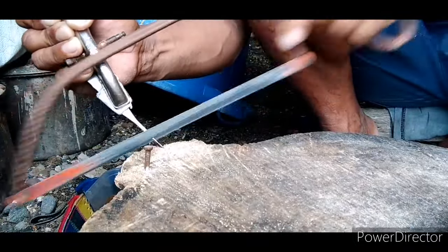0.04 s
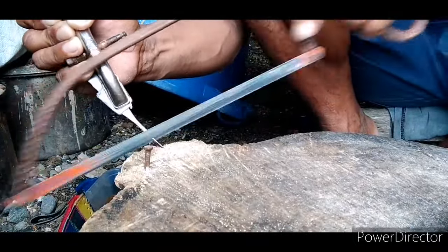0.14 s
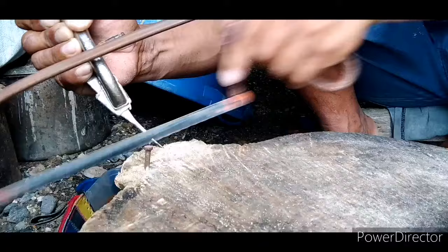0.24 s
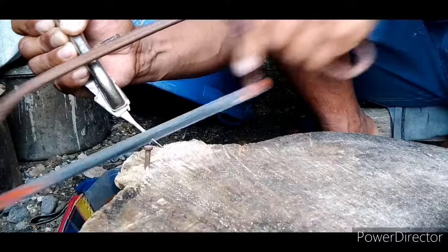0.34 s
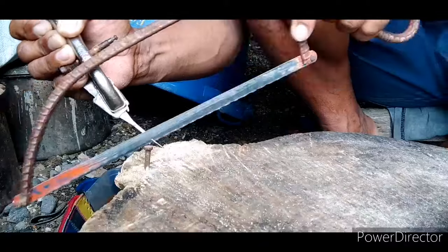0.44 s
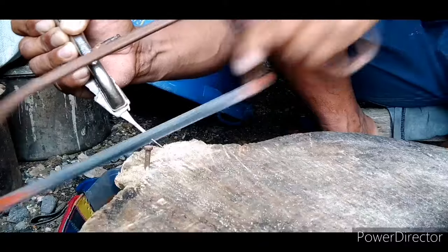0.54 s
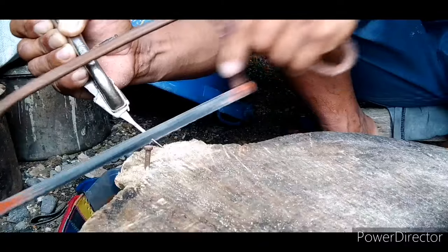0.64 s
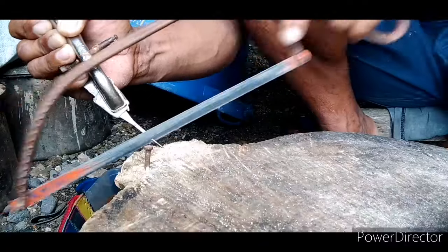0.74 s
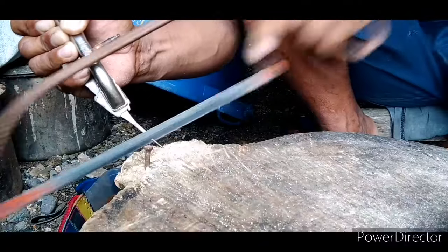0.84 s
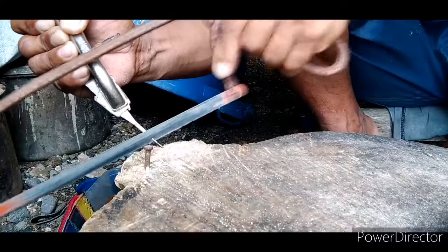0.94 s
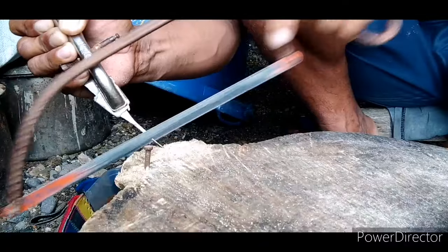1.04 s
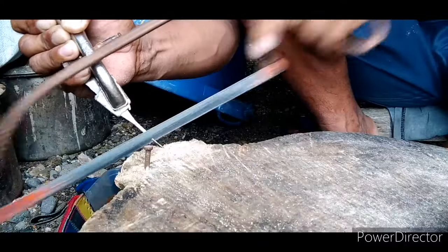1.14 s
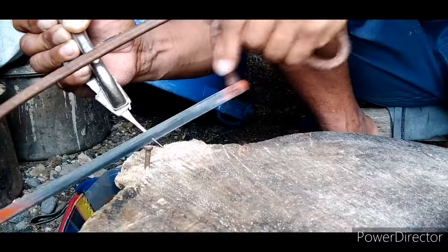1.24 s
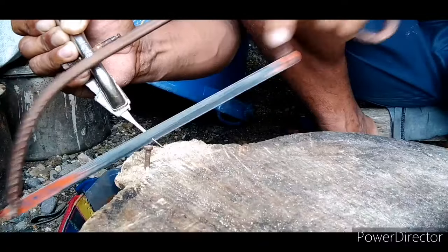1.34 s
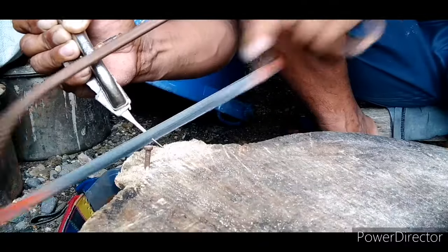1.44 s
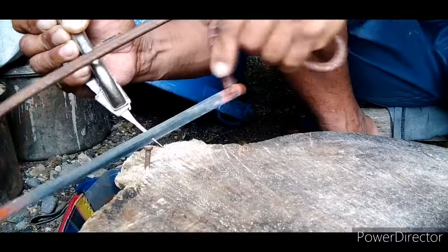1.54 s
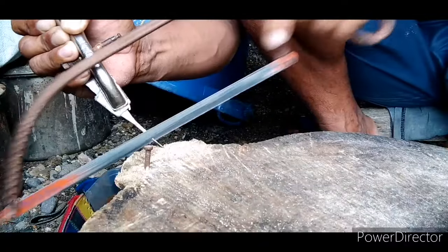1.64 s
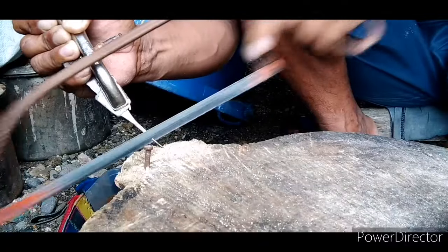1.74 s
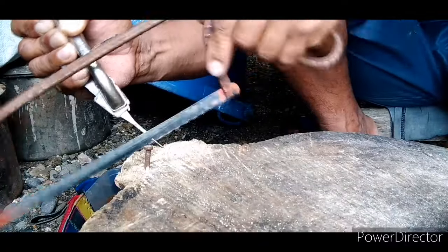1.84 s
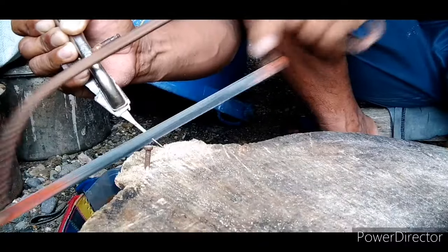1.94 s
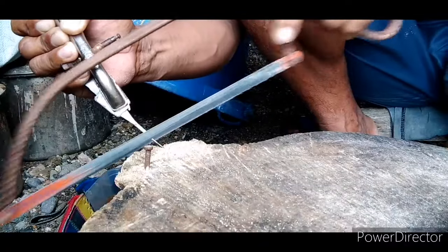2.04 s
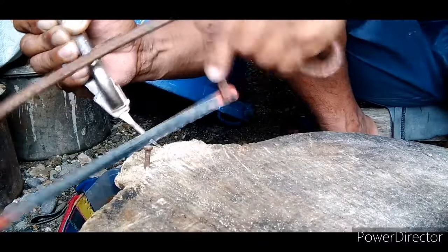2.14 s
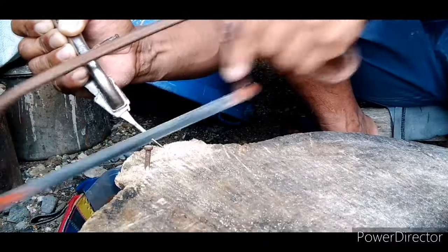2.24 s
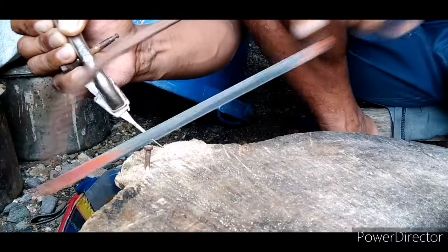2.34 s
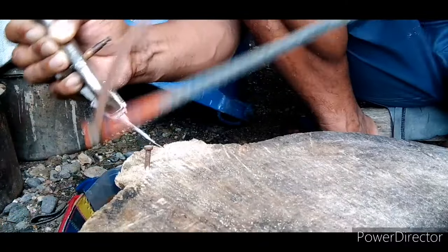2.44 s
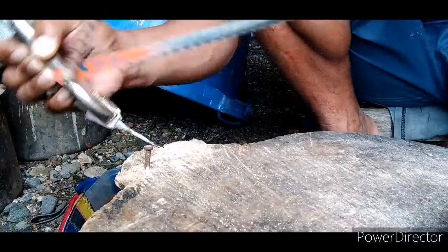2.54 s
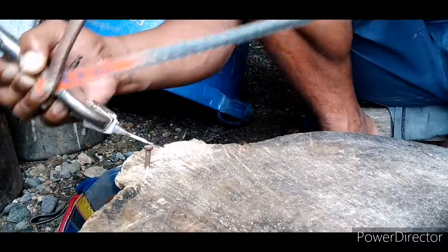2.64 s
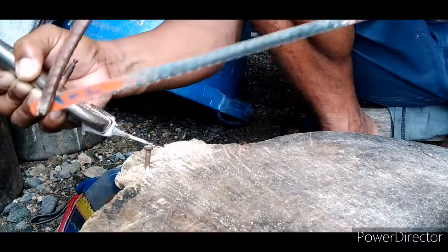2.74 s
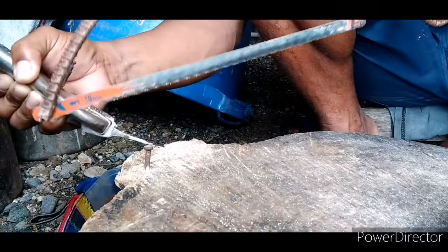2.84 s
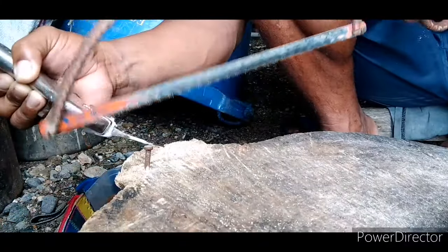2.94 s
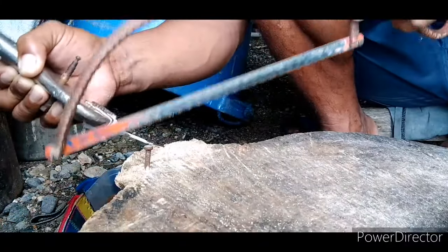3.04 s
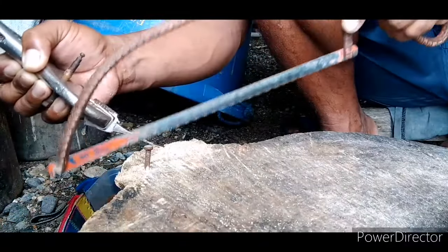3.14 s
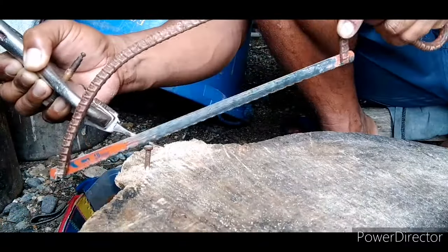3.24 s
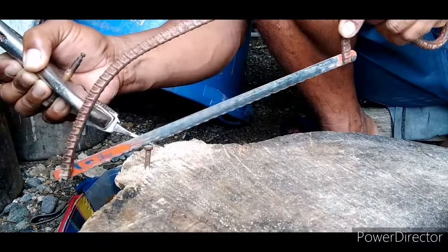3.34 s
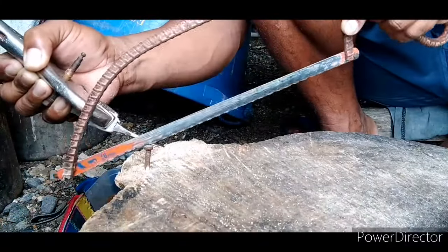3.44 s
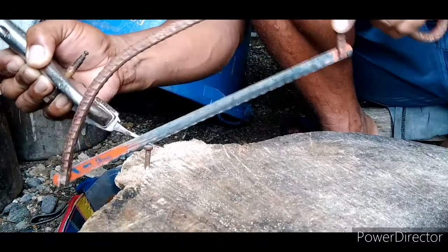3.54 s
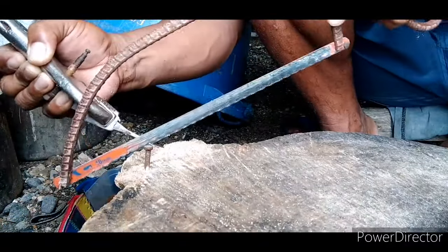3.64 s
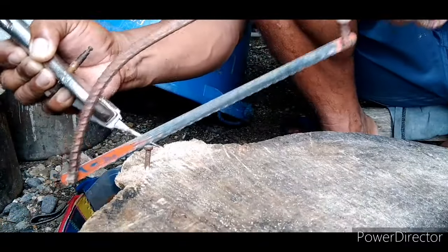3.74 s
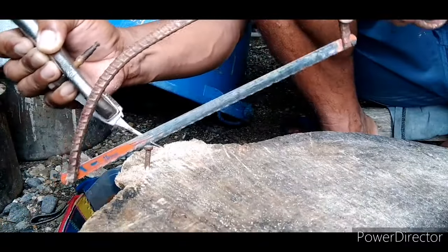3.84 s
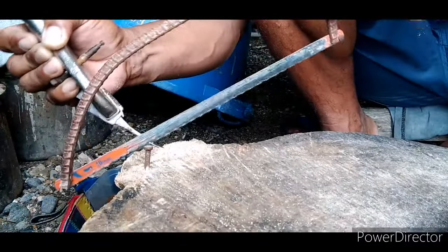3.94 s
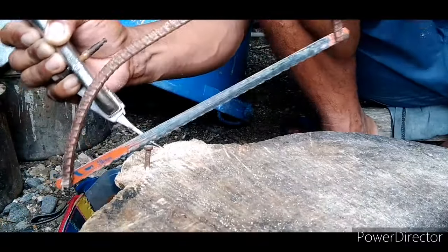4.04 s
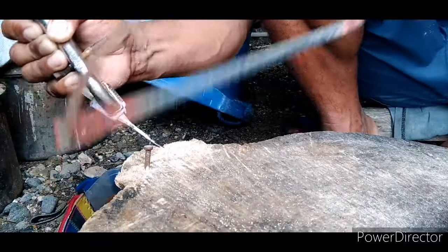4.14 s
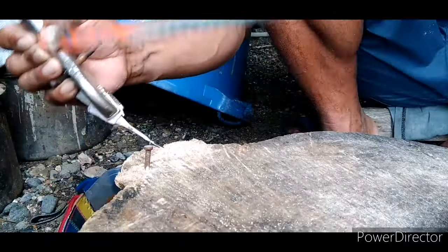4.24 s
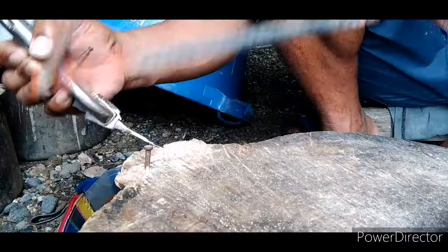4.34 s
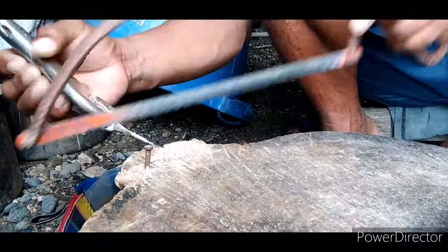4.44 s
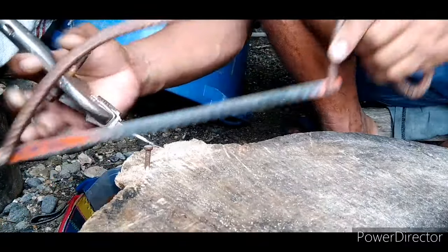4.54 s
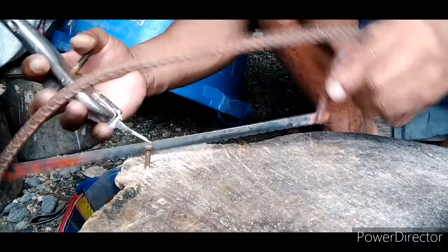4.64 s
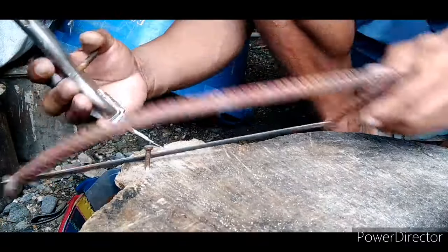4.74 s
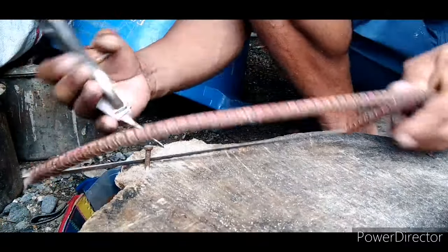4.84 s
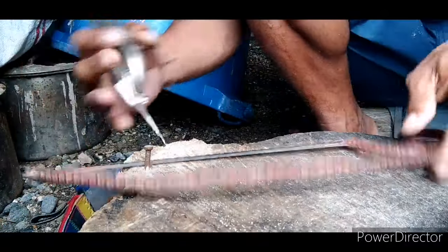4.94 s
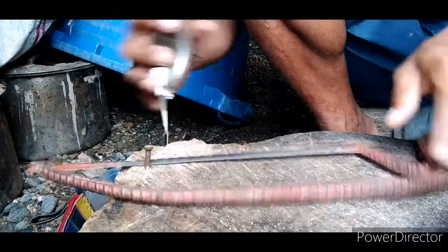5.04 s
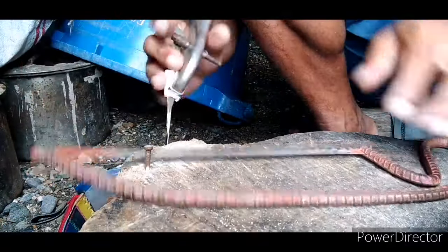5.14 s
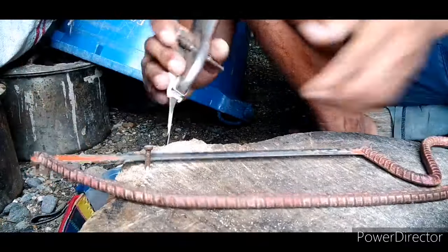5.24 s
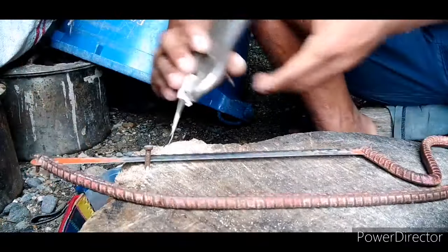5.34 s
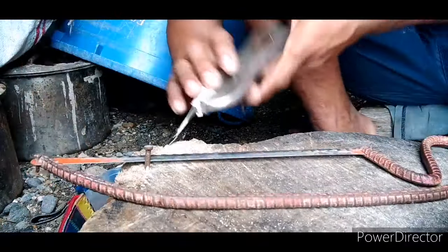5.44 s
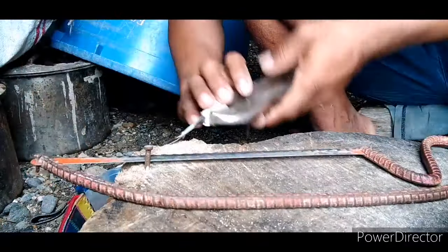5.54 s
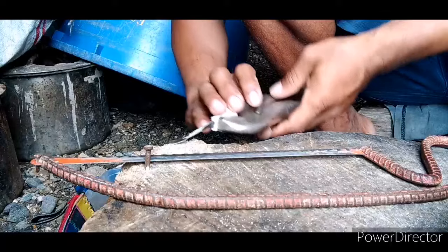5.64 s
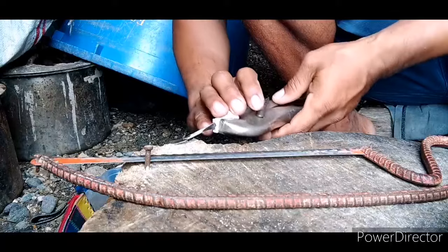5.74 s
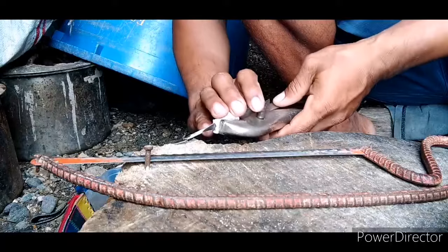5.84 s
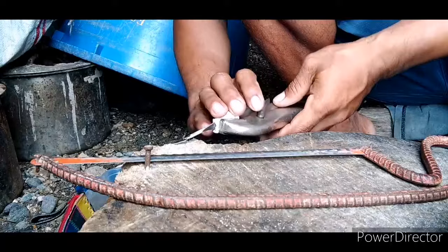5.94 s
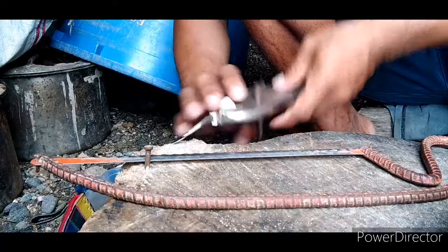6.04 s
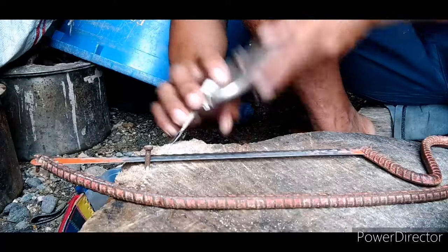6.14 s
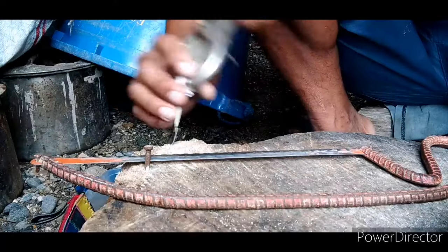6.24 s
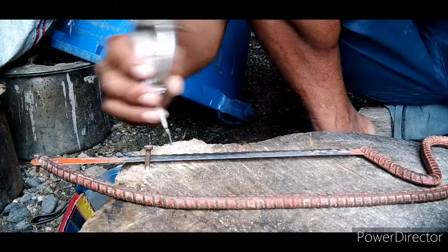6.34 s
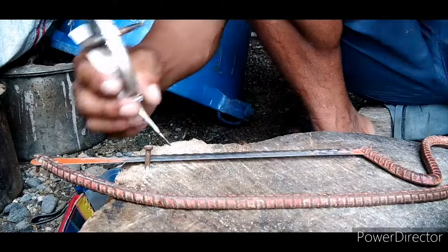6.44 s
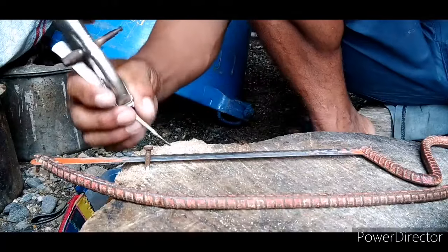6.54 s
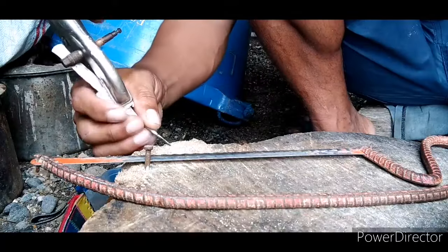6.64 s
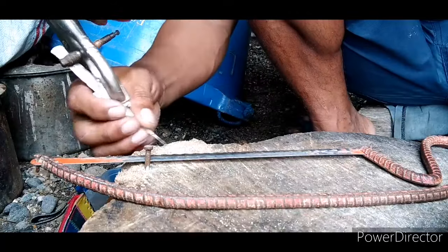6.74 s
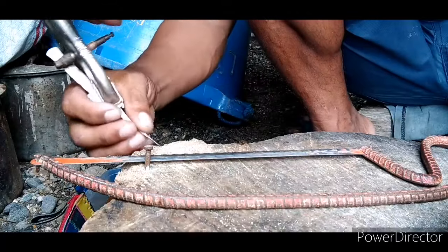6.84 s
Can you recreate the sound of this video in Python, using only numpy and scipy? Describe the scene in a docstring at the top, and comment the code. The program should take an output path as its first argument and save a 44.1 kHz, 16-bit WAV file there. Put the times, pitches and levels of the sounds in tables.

```python
"""A hacksaw with a bent steel-bar frame cuts a thin metal rod in a wooden stump, close to two microphones.
First eight hard pushes alternate with lighter pulls: tooth impacts rasp, snag and excite blade modes.
Then the saw is lifted: short noise bursts make steel tools tick and clink, wood knocks and hands rub.
Last the saw is laid on the stump, where it knocks, slides and rings by damped modes.
Filtered noise gives a low murmur and a faint hiss throughout."""
import sys
import numpy as np
from scipy import signal
from scipy.fft import rfft, irfft, next_fast_len
from scipy.io import wavfile

SR = 44100
rng = np.random.default_rng(int(sys.argv[2]) if len(sys.argv) > 2 else 0)


def to_wav(s):
    """Save 16-bit WAV."""
    ch = np.atleast_2d(s).T  # columns
    pcm = np.round(np.clip(ch, -1, 1) * 32767)  # PCM
    wavfile.write(sys.argv[1], SR, pcm.astype(np.int16))


N = 303408
CUTOFF_HZ = 15750

# forward strokes: (start [s], length [s], rasp [dB], fastest at share [0-1], blade bending [dB],
# snag as teeth seat [dB], snag as they bite [dB])
PUSHES = [ (0.027, .23, -8, 0.4, -20, -16, -12), (0.404, .2, -8, 0.42, -24, -11, -16),
          (0.729, .19, -7, 0.48, -20.5, -11, -5), (1.045, 0.19, -8.5, 0.44, -23.5, -18, 3),
          (1.348, 0.19, -6.5, 0.29, -23, -1.5, -12), (1.648, 0.18, -7.5, 0.41, -22, -6.5, -14),
          (1.991, 0.17, -5.5, 0.21, -20.5, 1.5, -3), (2.328, 0.25, -6, 0.36, -21, -8, 4)]
# return strokes: (start [s], length [s], rasp [dB], fastest at share [0-1], blade bending [dB],
# snag as teeth bite [dB])
PULLS = [ (-0.11, 0.16, -3, 0.42, -23, -14), (0.218, 0.22, -11.5, 0.45, -28.5, -12),
         (0.558, 0.2, -14.3, 0.47, -33.5, -27), (0.881, 0.2, -14, 0.46, -30.5, -27),
         (1.179, 0.19, -14.5, .56, -37, -28), (1.478, .19, -15.5, 0.55, -33.5, -5.5),
         (1.79, 0.18, -15, 0.5, -33.5, -16), (2.12, 0.18, -14.5, 0.67, -36, -26)]
# blade grazes the rod without cutting: (start [s], length [s], rasp [dB], fastest at share [0-1],
# blade bending [dB])
GRAZES = [(1.957, 0.029, -24.5, 0.26, -29.5), (3.825, 0.065, -42.5, 0.48, -51.5),
          (3.972, 0.044, -31, 0.72, -40)]
# colour of the tooth impacts: (frequency [Hz], level [dB per Hz])
PUSH_COLOUR = [(30, -1.5), (120, -13), (300, -12), (700, -14.5), (1300, -9), (2400, -11.5), (2700, -15.5),
               (3100, -1.5), (3480, -12.5), (3950, -1.5), (6000, -3.5), (8700, -3), (12000, 0),
               (15500, -2.5)]
PULL_COLOUR = [(30, -6.5), (120, -11), (300, -12), (750, -6.5), (1300, -4.5), (2400, -7), (3000, 0),
               (3480, -7.5), (3950, -1), (6000, -3), (8700, -1.5), (12000, -1.5), (15500, -4)]
# bending modes of the stretched blade, before the pitch wavers:
# (frequency [Hz], width [Hz], push level [dB], pull level [dB])
BENDING = [(649, 50, -35, -2), (934, 37.5, -17.5, 6), (1360, 46, -22, -4), (1811, 35, -4, 9),
           (1834, 25, -1.5, 6.5), (2075, 100, -16.5, -11), (2267, 23, -7, 2)]
PUSH_POWER, PULL_POWER = 2.47, 3.25  # rasp grows as these powers of blade speed


def sawing():
    """Hard cutting pushes and lighter dragging pulls."""
    _, _, push_mode_db, pull_mode_db = np.transpose(BENDING)
    push = strokes(PUSHES, PUSH_POWER, PUSH_COLOUR, push_mode_db,
                   rasp_db=-5.0, sing_db=-8.0, bend_db=-2.0, rough_db=2.5)
    pull = strokes(PULLS + GRAZES, PULL_POWER, PULL_COLOUR, pull_mode_db,
                   rasp_db=-5.0, sing_db=-8.5, bend_db=0.0, rough_db=3.0)
    snags = catches(level_db=-14.5, t60_s=0.077, pluck_db=7.0, pluck_hz=2010, pluck_width_hz=220)
    return push + pull + snags


# high modes of blade and rod, set ringing by the teeth: (frequency [Hz], width [Hz], level [dB])
SINGING = [(3230, 70, -4), (4320, 65, 2), (4757, 38, -3), (5328, 60, 2), (6048, 60, 2), (6690, 60, -2),
           (7299, 110, -1), (7620, 70, 1), (9237, 40, 5), (9567, 38, 0), (10238, 40, 1), (10499, 70, 0),
           (10912, 65, 1), (13749, 50, 0), (14094, 27, 3)]


def strokes(rows, power, spectrum, mode_db, rasp_db, sing_db, bend_db, rough_db):
    """Teeth chip through the rod: a bright rasp, high modes, and the blade shuddering in bending modes."""
    bite = swells([row[:4] for row in rows], power)
    impacts = bite * friction(per_s=10000, judder_hz=233.1, judder_db=rough_db)
    chips = scatter(impacts, t60_s=0.0087)
    singing = sum(from_db(db) * resonate(chips, hz, width_hz) for hz, width_hz, db in SINGING)
    rasp = travel(colour(chips, spectrum))
    shudder = bending(rows, mode_db)
    return from_db(rasp_db) * rasp + from_db(sing_db) * singing + from_db(bend_db) * shudder


BENDING_POWER = 1.83  # bending grows as this power of blade speed


def bending(rows, mode_db):
    """Slipping contact drives the blade's bending modes; changing tension bends their pitch."""
    flex = swells([(s, length_s, db, fastest) for s, length_s, _, fastest, db, *_ in rows], BENDING_POWER)
    slips = friction(per_s=3000, judder_hz=110.4, judder_db=1.5)
    # long waves reach both microphones nearly alike
    slips = slips[0] + from_db(-6.5) * slips[1] * [[1], [-1]]
    modes = np.zeros((2, N))
    for (hz, width_hz, *_), db in zip(BENDING, mode_db):
        modes += from_db(db + 1.58 * wander(8)) * resonate(slips, hz, width_hz)
    modes = rms_one(modes)
    clock = np.cumsum(blade_pitch())
    return flex * np.array([np.interp(clock, np.arange(N), side) for side in modes])


# blade is stiffer near its end: pitch rise [share], e-folding time either side of the peak [s]
TURN_RISE, TURN_S = .08, .028


def blade_pitch():
    """Relative pitch of the bending modes: highest as a push begins, wavering with the tension."""
    t = np.arange(N) / SR
    near_end = sum(np.exp(-abs(t - s - SEAT_S) / TURN_S) for s, *_ in PUSHES)
    return 1 + TURN_RISE * near_end + .009 * wander(9)


def travel(x, count=12):
    """The contact slides past nodes of the blade, so bands swell and fade independently."""
    for hz in np.geomspace(1300, 13000, count):
        band_gain = from_db(3.8 * wander(9) - 1)
        x = x + (band_gain - 1) * resonate(x, hz, 250 + hz / 16)
    return x


SEAT_S, BITE_S = .016, .045  # snag delays from stroke start; pulls only bite


def catches(level_db, t60_s, pluck_db, pluck_hz, pluck_width_hz):
    """A snagged tooth lets go with a snap that plucks the blade."""
    snaps = np.zeros((2, N))
    seating = [(s + SEAT_S, db) for s, *_, db, _ in PUSHES]
    biting = [(s + BITE_S, db) for s, *_, db in PUSHES + PULLS]
    for s, db in seating + biting:
        add(snaps, s, from_db(db + level_db) * burst(t60_s))
    pluck = resonate(snaps.mean(axis=0), pluck_hz, pluck_width_hz)
    return colour(snaps, PUSH_COLOUR) + from_db(pluck_db) * pluck


# stump jolts under a hard push: (time [s], level [dB])
JOLTS = [(0.814, -17.5), (2.416, -26.5), (2.466, -21)]


def jolts(settle_s, swing_hz):
    """A jolt of the stump sends out a steep pressure step that swings slowly back."""
    out, t = np.zeros(N), np.arange(SR // 2) / SR
    step = (1 - np.exp(-t / 0.00017)) * np.exp(-t / settle_s) * np.cos(2 * np.pi * swing_hz * t)
    for s, db in JOLTS:
        add(out, s, from_db(db) * step)
    return out * from_db([[-12], [5]])  # left, right


# colour of steel contacts: (frequency [Hz], level [dB per Hz])
CLINK_COLOUR = [(100, -6), (900, 1), (1900, -8), (2500, -8), (3100, -2), (3600, -7), (4400, 1.5),
                (6000, -5), (9000, -4), (15000, -8)]
# modes of the saw frame, in the hand and on the stump: (frequency [Hz], level [dB], t60 [s])
FRAME_HELD = [(1837, -2, .7), (2950, -9, .45), (4346, 0, .4), (4440, -2, .12), (4899, 1, .42),
              (6052, -10, .3), (7730, -12, .2), (9125, -7, .2), (10385, -8, .22), (10615, -6, .22),
              (11159, -10, .2)]
FRAME_LYING = [(3250, -4, .2), (3860, -4, .24), (4473, -1, .26), (4531, -3, .25), (5412, 3, .36),
               (6052, -6, .18), (7150, -7, .45), (7365, -11, .3), (7763, -11, .18), (9255, 1, .25),
               (10010, -4, .2), (10538, 0, .22), (11050, -7, .26), (11577, -4, .2), (12840, -3, .13)]
LAID_DOWN_S = 5.0  # from here on the saw rests on the stump


def handling(tick_db, clink_db, slide_db, ring_db, body_hz, pan_db):
    """Ticks, clinks and the slide of the blade; the last two set the frame ringing."""
    tick = ticks(tick_db)
    clink, shake, body = clinks(clink_db, pan_db)
    slide = sliding(slide_db)
    lying = np.arange(N) > LAID_DOWN_S * SR
    held_ring = frame(shake * ~lying, FRAME_HELD)
    lying_ring = frame(shake * lying + from_db(ring_db) * slide, FRAME_LYING)
    contacts = colour(tick + clink + slide, CLINK_COLOUR)
    return contacts + held_ring + lying_ring + resonate(body, body_hz, 65)


# small dry ticks of the handled tools: (time [s], level [dB])
TICKS = [(2.604, -25), (2.6787, -27), (3.023, -29), (3.038, -19), (3.149, -27), (3.321, -28),
         (3.4788, -23.5), (4.4746, -25.5), (4.7447, -26.5), (6.115, -27), (6.6374, -25.5)]


def ticks(level_db):
    """Handled tools touch: very short noise bursts."""
    out = np.zeros((2, N))
    for s, db in TICKS + faint_ticks():
        add(out, s, from_db(db + level_db) * burst(t60_s=.007))
    return out


FAINT_TICKS_PER_S, FAINT_TICK_DB, SAWING_ENDS_S = 2.5, -30, 2.6


def faint_ticks():
    """Chance touches of the tools in the hands after the sawing: rows (time [s], level [dB])."""
    step_s = .01
    times_s = np.arange(SAWING_ENDS_S, N / SR, step_s)
    touched = rng.random(len(times_s)) < FAINT_TICKS_PER_S * step_s
    return [(s, FAINT_TICK_DB) for s in times_s[touched]]


# steel touches steel: (time [s], level [dB], rattle t60 [s], frame ring [dB], blade body [dB],
# thin below [Hz])
CLINKS = [ (2.528, -27.5, 0.036, 32.5, 7, 1500), (3.522, -37, 0.063, 2, 14, 500),
          (3.643, -26, 0.094, 4, 9, 500), (4.226, -23.5, .029, 21.5, 3, 1500),
          (4.239, -17.5, .04, 11.5, 1, 1200), (4.287, -22, 0.093, 7, -20, 5000),
          (4.633, -4.5, 0.05, -22, -6, 7800), (4.639, -8, 0.038, -13, -1, 7200),
          (5.127, -34, 0.19, 18, -4, 3000), (5.213, -19, 0.17, -1, 7.5, 1000),
          (6.485, -31.5, 0.047, 11.5, 5, 2500)]


def clinks(level_db, pan_db):
    """Rattling steel contacts: the thinned noise, and the drives of frame and blade body."""
    out, shake, body = np.zeros((3, 2, N))
    pan = pan_db * np.array([[.5], [-.5]])
    for s, db, rattle_s, frame_db, body_db, thin_hz in CLINKS:
        contact = from_db(db + level_db + pan) * burst(rattle_s)
        thin = signal.butter(1, min(thin_hz, CUTOFF_HZ), "high", fs=SR, output="sos")
        add(out, s, signal.sosfilt(thin, contact))
        add(shake, s, from_db(frame_db) * contact)
        add(body, s, from_db(body_db) * contact)
    return out, shake, body


# blade slides along the rod as the saw is laid down:
# (start [s], length [s], level [dB], fastest at share [0-1])
SLIDE = [(5.185, .22, -26, 0.2)]
SLIDE_POWER = 1.29  # gain grows as this power of speed


def sliding(level_db):
    """The sliding contact grips and slips: clumped impacts follow the speed."""
    impacts = swells(SLIDE, SLIDE_POWER) * friction(per_s=5000, judder_hz=149, judder_db=5.0)
    return from_db(level_db) * scatter(impacts, t60_s=0.016) * from_db([[-1.5], [1.5]])


def frame(drive, modes):
    """The steel frame rings on after whatever shakes it."""
    return sum(from_db(db) * resonate(drive, hz, np.log(1000) / np.pi / t60_s) for hz, db, t60_s in modes)


# dull knocks on wood: (time [s], level [dB], centre [Hz])
KNOCKS = [(0.814, -24.5, 134), (2.464, -30, 202), (3.606, -39, 940), (3.642, -42.5, 460), (4.093, -27, 740),
          (4.543, -34.5, 750), (4.759, -41.5, 135), (4.982, -41, 975), (5.017, -35, 430), (5.113, -31, 381),
          (5.196, -29.5, 393), (5.244, -36, 604), (5.292, -30, 436), (5.39, -37, 395), (5.423, -37.5, 590)]
# low modes of the stump: (frequency [Hz], width [Hz], level [dB])
STUMP = [(87, 13, -3.5), (147, 14, 5), (263.5, 28, 6)]
BOOM_HZ, BOOM_DB, BOOM_LOSS_DB_PER_OCTAVE = 383, 5, 23  # knock pitch that booms most


def knocks(level_db, t60_s, relative_width, dull_hz):
    """Wood answers a blow with one broad damped resonance, and the stump's modes boom under it."""
    out = np.zeros((2, N))
    soft = signal.butter(3, dull_hz, fs=SR, output="sos")
    for s, db, hz in KNOCKS:
        boom_db = BOOM_DB - BOOM_LOSS_DB_PER_OCTAVE * abs(np.log2(hz / BOOM_HZ))
        blow = burst(t60_s, channels=1) + from_db(-7) * burst(t60_s)  # mostly alike on both sides
        boom = sum(from_db(boom_db + mode_db) * resonate(blow, mode_hz, width_hz)
                   for mode_hz, width_hz, mode_db in STUMP)
        thud = signal.sosfilt(soft, resonate(blow, hz, relative_width * hz) + boom)
        add(out, s, from_db(db + level_db) * thud / abs(thud).max())
    return out


def walls(x, level_db, t60_s):
    """A short decaying noise tail from the surfaces nearby."""
    tail = burst(t60_s)
    tail = tail / np.linalg.norm(tail[0])
    return from_db(level_db) * signal.fftconvolve(x, tail, axes=-1)[:, :N]


# surroundings and the microphones' own hiss: (frequency [Hz], level [dB per Hz])
AMBIENCE = [(25, -4.5), (50, 5), (125, 1), (220, -13), (450, -8.5), (900, -11), (1500, -53), (3000, -18.5),
            (15000, -111)]
HISS = [(25, 12), (130, 0), (250, -5.5), (600, -1), (1100, 11), (1700, -0.5), (2600, 0.5), (5000, -3),
        (10000, -3.5), (15500, -6)]


def background(ambience_db, hiss_db, rub_db):
    """Low outdoor murmur of air, steady hiss, and skin rubbing on the tools."""
    air = from_db(ambience_db) * colour(rng.standard_normal(N), AMBIENCE)
    hiss = from_db(hiss_db) * colour(rng.standard_normal((2, N)), HISS)
    return air + hiss + rubbing(rub_db)


# hands rub on the tool grip: (start [s], length [s], level [dB], fastest at share [0-1])
RUBS = [(3.15, 0.39, -49, 0.74), (4.2, 0.33, -50, .45), (4.65, 0.55, -52, 0.2), (5.35, 0.28, -55, 0.5),
        (5.75, 0.17, -41.5, 0.16), (6.33, 0.085, -56, 0.6)]
# colour of skin on the grip: (frequency [Hz], level [dB per Hz])
RUB_COLOUR = [(200, -17), (900, 2.5), (2000, 0), (4000, -9), (9000, -4.5), (15000, -19)]
RUB_POWER = 1.3  # gain grows as this power of speed


def rubbing(level_db):
    """Skin grips and slips on the grip: sparse impacts, smeared and coloured."""
    impacts = swells(RUBS, RUB_POWER) * friction(per_s=1100, judder_hz=60.0, judder_db=4.0)
    return from_db(level_db) * colour(scatter(impacts, t60_s=0.022), RUB_COLOUR)


def swells(moves, power):
    """Each move speeds up from rest and slows again; its gain is a power of the speed."""
    out = np.zeros(N)
    for start_s, length_s, db, fastest in moves:
        t = np.arange(max(round(start_s * SR), 0), round((start_s + length_s) * SR)) / SR
        turning_points = [0, np.clip(fastest, .05, .95), 1]
        phase = np.interp((t - start_s) / length_s, turning_points, [0, np.pi / 2, np.pi])
        add(out, t[0], from_db(db) * abs(np.sin(phase)) ** power)
    return out


def friction(per_s, judder_hz, judder_db):
    """Tiny impacts of uneven size, coming in clumps as the contact grips and slips; unit power."""
    impacts = (rng.random((2, N)) < per_s / SR) * rng.laplace(size=(2, N))
    return rms_one(impacts * from_db(judder_db * wander(judder_hz)))


def scatter(x, t60_s, count=70):
    """Many short-lived modes (all-passes in series) smear impacts uncoloured, differently per side."""
    r = from_db(-60 / (max(t60_s, 1e-3) * SR))
    responses = []
    for hz in rng.uniform(1000, CUTOFF_HZ, (2, count)):
        all_passes = [[r * r, c, 1, 1, c, r * r] for c in -2 * r * np.cos(2 * np.pi * hz / SR)]
        responses.append(signal.sosfilt(all_passes, signal.unit_impulse(SR // 10) + 1e-18))
    return signal.fftconvolve(np.atleast_2d(x), np.array(responses), axes=-1)[:, :N]


def burst(t60_s, channels=2):
    """Noise that starts at unit power and dies away."""
    t = np.arange(SR // 4) / SR
    return rng.standard_normal((channels, len(t))) * np.exp(-np.log(1000) * t / max(t60_s, 1e-3))


def wander(rate_hz):
    """Slow chance with spread 1: random knots at twice the rate, joined by lines."""
    knots = rng.standard_normal(int(N / SR * 2 * rate_hz) + 2)
    return rms_one(np.interp(np.arange(N) / SR * 2 * rate_hz, np.arange(len(knots)), knots))


def resonate(x, hz, width_hz):
    """A resonance with gain 1 at its top."""
    r = np.exp(-np.pi * width_hz / SR)
    zeros = np.array([1, 0, -1]) * (1 - r * r) / 2
    poles = [1, -2 * r * np.cos(2 * np.pi * hz / SR), r * r]
    return signal.lfilter(zeros, poles, x + 1e-18)


def colour(x, points):
    """Shape a sound by a spectrum interpolated over log frequency."""
    size = next_fast_len(N + 8192, real=True)
    hz, db = np.transpose(points)
    bins_hz = np.arange(size // 2 + 1) * SR / size
    gain = from_db(np.interp(np.log(bins_hz + 1), np.log(hz), db))
    return irfft(rfft(x, size) * gain, size)[..., :N]


def add(out, s, sound):
    """Mix a short sound in at time s."""
    start = max(round(s * SR), 0)
    out[..., start:start + sound.shape[-1]] += sound[..., :N - start]


def from_db(db):
    """Decibels to gain."""
    return 10 ** (np.asarray(db) / 20)


def rms_one(x):
    """Scale to unit power."""
    return x / np.sqrt(np.mean(x ** 2) + 1e-20)


def scene():
    """Sawing, handling and knocks with a short tail, over jolts and background."""
    tools = sawing()
    tools = tools + handling(tick_db=-4.5, clink_db=-7.0, slide_db=-5.0, ring_db=17.0, body_hz=1885, pan_db=2.0)
    tools = tools + knocks(level_db=0.0, t60_s=0.14, relative_width=0.62, dull_hz=1100)
    tools = tools + walls(tools, level_db=-9.0, t60_s=0.11)
    stump = jolts(settle_s=0.083, swing_hz=4.3)
    return tools + stump + background(ambience_db=-38.5, hiss_db=-51.5, rub_db=-1.0)


def port(x, resonances):
    """The sound inlet of a microphone lifts a few bands."""
    return x + sum((from_db(db) - 1) * resonate(x, hz, width_hz) for hz, width_hz, db in resonances)


# resonances of the two microphone ports: (frequency [Hz], width [Hz], lift [dB])
LEFT_PORT = [(4467, 320, 10), (5900, 1600, 10), (7260, 580, 16)]
RIGHT_PORT = [(10740, 1230, 15.43)]


def record(dry):
    """Each microphone colours its side, the loudest peaks clip, the top is cut."""
    heard = np.array([port(dry[0], LEFT_PORT), port(dry[1], RIGHT_PORT)])
    low_pass = signal.ellip(14, .1, 80, CUTOFF_HZ, fs=SR, output="sos")
    return signal.sosfilt(low_pass, np.clip(heard, -.95, .95))


dry = scene()
out = record(dry)
to_wav(out)
```